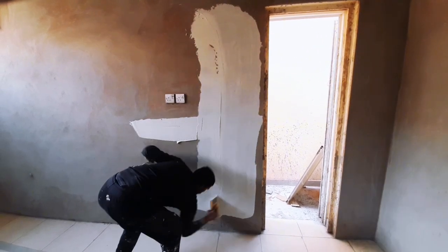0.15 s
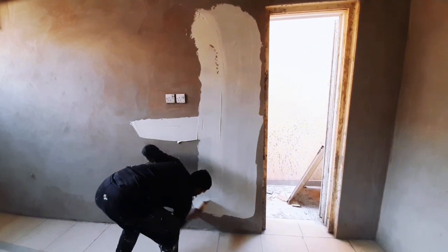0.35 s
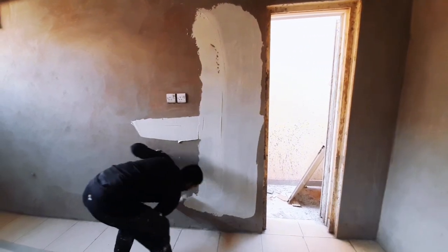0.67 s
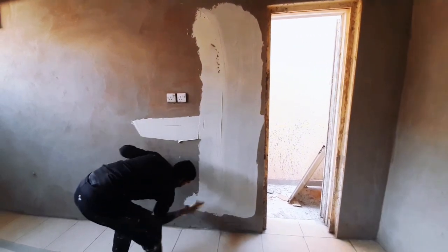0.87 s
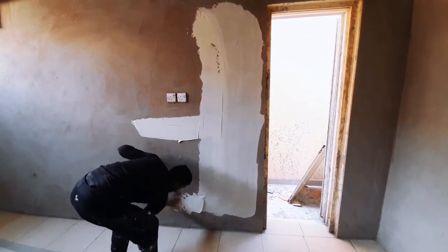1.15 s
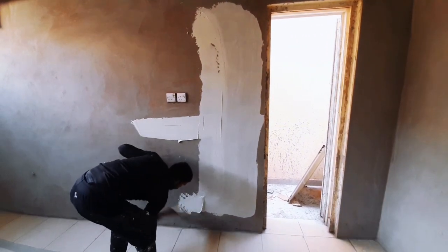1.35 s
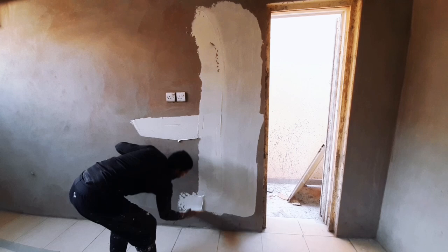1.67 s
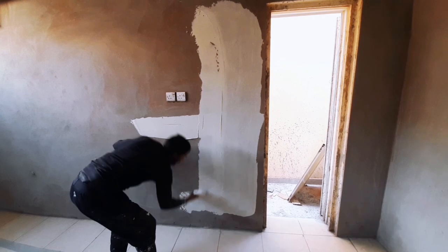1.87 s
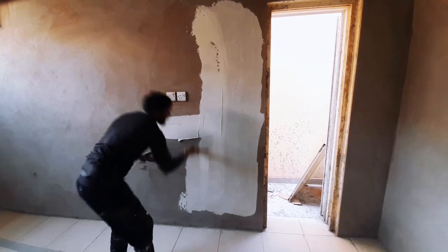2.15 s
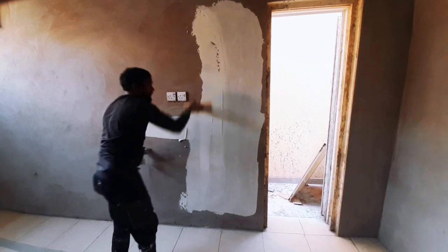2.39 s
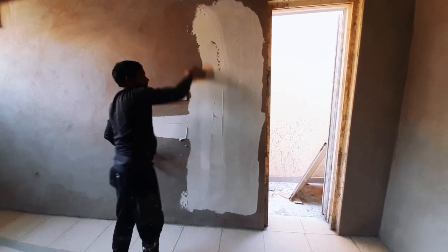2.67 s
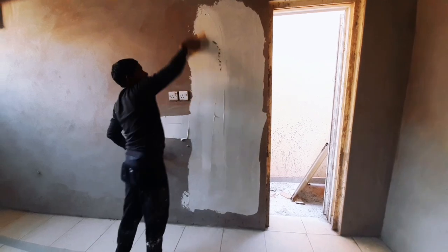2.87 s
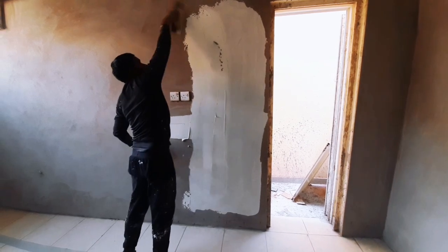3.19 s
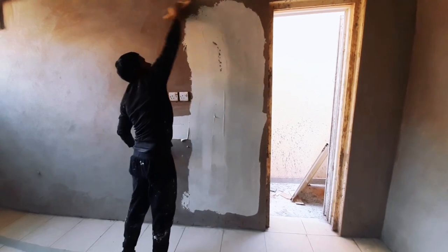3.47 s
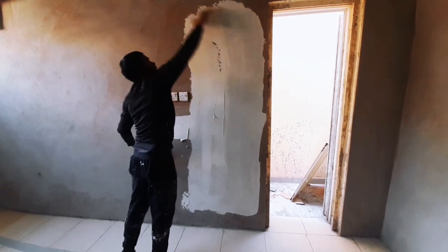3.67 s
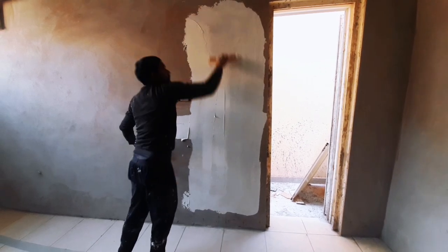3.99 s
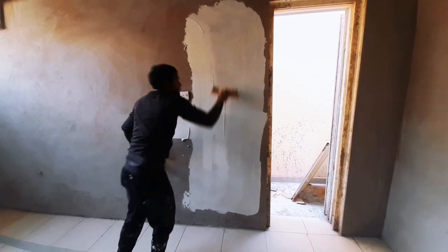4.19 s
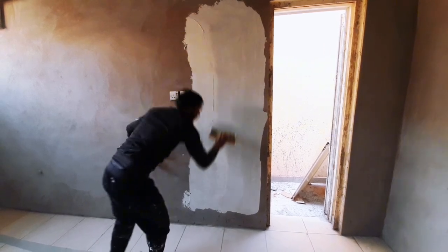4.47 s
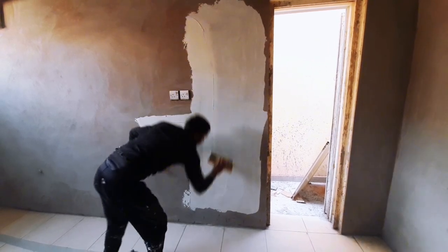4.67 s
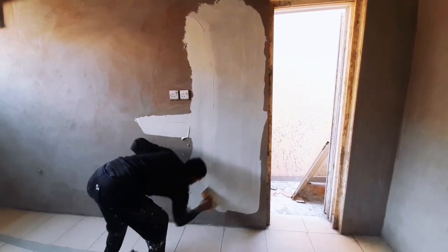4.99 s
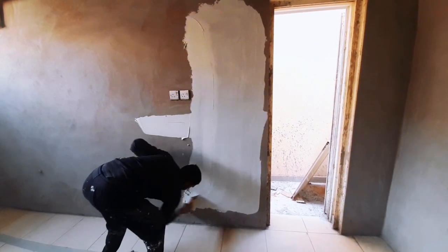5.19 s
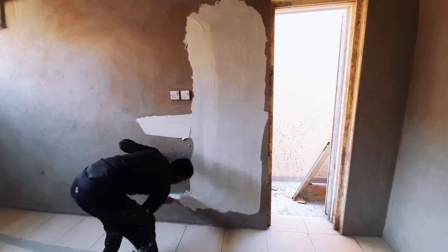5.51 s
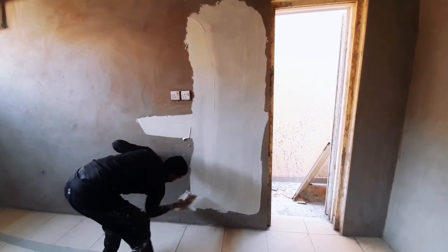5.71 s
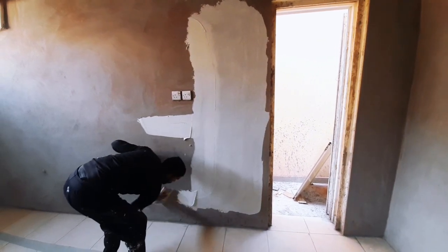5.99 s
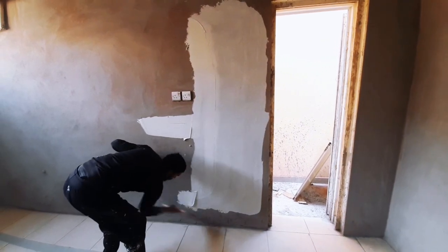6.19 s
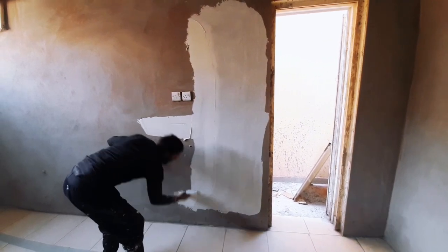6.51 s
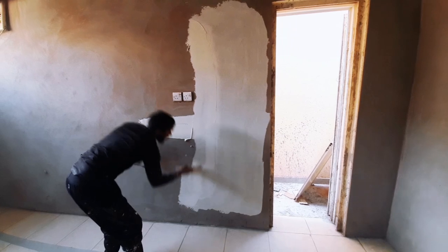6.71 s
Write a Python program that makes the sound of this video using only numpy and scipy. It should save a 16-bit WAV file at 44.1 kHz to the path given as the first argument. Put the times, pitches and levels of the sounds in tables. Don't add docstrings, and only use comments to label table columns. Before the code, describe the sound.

In a bare, hard-walled room, a steel plastering blade drags gritty putty across cement. A rough pull opens, then a quiet reloading with soft knocks, short swipes and a strong upward push. A faint glide leads to harsh scrapes at the top and a long downward pull, then another quiet loading, a wipe, a sharp knock and a last push. Stereo, roomy pickup with a faint low hum.

```python
import sys
import numpy as np
from scipy import signal
from scipy.fft import rfft, irfft, next_fast_len
from scipy.io import wavfile
from scipy.ndimage import uniform_filter1d, map_coordinates

SR = 44100
rng = np.random.default_rng(int(sys.argv[2]) if len(sys.argv) > 2 else 0)


def natural_amplitude(level_db):
    exponent = np.asarray(level_db, float) / 20
    return 10 ** exponent


def master_out(mix):
    frames = np.transpose(np.atleast_2d(mix))
    ceiling = np.clip(frames, -1, 1)
    pcm = np.round(ceiling * 32767).astype(np.int16)
    wavfile.write(sys.argv[1], SR, pcm)


N = 302085
RUN_IN = 22050
TOTAL = N + RUN_IN

# time_s, pressure_db, flatness, bend
FIRST_PULL = [(0.0, -16.5, 0.73, .1), (.16, -19.5, 0.94, .3), (.3, -17, 0.86, 0.45), (.44, -20, 0.61, 1.0),
              (.55, -24.5, 0.94, 0.55), (.66, -23.5, 1, 0.1)]
FIRST_LOADING = [(.86, -36, 0.42, -0.87), (1.01, -34, 0.83, -1.41)]
PUSH_UP = [(1.686, -11, 0.82, -0.77), (1.77, -22, 0.57, -0.56), (1.859, -21.5, 1.0, -0.72),
           (1.93, -14.5, 0.47, -0.59), (2.04, -17.5, 0.84, 0.79), (2.14, -17, 0.29, 1),
           (2.248, -12.5, 0.64, 0.64)]
GLIDE_UP = [(2.37, -32.5, .55, 0.0), (2.51, -32.5, 0.87, -0.28), (2.63, -30.5, .55, -0.7)]
FLICK_AT_TOP = [(3.12, -34.5, .4, -1.3), (3.18, -24.5, 0.23, -0.38), (3.22, -16.5, 0.05, 0.22),
                (3.29, -18.5, 0.26, 0.64)]
TURN_AT_TOP = [(3.34, -26.5, 0.52, -.4), (3.45, -23, 0.46, -1.3), (3.52, -12, 0.48, -2.2),
               (3.59, -8.5, 0.58, -1), (3.76, -21, 0.77, 0.99), (3.95, -13, 0.5, -0.6)]
LONG_PULL = [(3.97, -15, 0.8, -0.31), (4.08, -15, 0.55, 0.046), (4.35, -16.5, 0.79, -0.62),
             (4.42, -20.5, .7, -.3), (4.58, -16, 0.63, 0.17), (4.78, -16.5, 0.68, -0.048),
             (5.0, -19, 0.87, -.2), (5.38, -19, 0.73, -0.59), (5.47, -26, 0.85, -.1)]
SECOND_LOADING = [(5.58, -47, 1.42, -.1), (5.7, -41, 0.71, -.2), (5.8, -34.5, 1.02, -0.33)]
WIPE = [(5.925, -24, 0.42, -0), (5.99, -16, 0.18, -0.1), (6.08, -34, 0.78, -0.8)]
LAST_PUSH = [(6.55, -26, 0.61, -.9), (6.59, -20, 0.75, -.7), (6.64, -15.5, 0.86, -0.25),
             (6.75, -15.5, 0.25, -0.14), (6.85, -21.5, 0.67, -.7)]
STROKES = (FIRST_PULL, FIRST_LOADING, PUSH_UP, GLIDE_UP, FLICK_AT_TOP, TURN_AT_TOP, LONG_PULL,
           SECOND_LOADING, WIPE, LAST_PUSH)
STROKE_DRYNESS = [-1.5, 2.5, 0, -3.5, 3, -0.5, 0.5, 3.5, 3.5, 0]
# peak_s, rise_s, fall_s, pressure_db, flatness
SWIPES = [
    (1.269, .19, 0.095, -17, 0.29),
    (1.45, .3, .2, -48, 0.99),
    (1.593, .012, 0.065, -19, 0.9),
    (2.8, 0.11, 0.037, -27.5, 0.62),
    (3.04, 0.076, .3, -39.5, 0.74),
    (6.18, 0.34, 0.38, -41, 0.78),
    (6.423, 0.13, 0.093, -17, 0.68),
    (6.49, 0.091, 0.13, -21.5, 0.63),
]
# time_s, height_m
BLADE_HEIGHT = [(0.0, 1.4), (.3, 0.11), (.8, 0.25), (1.8, 0.09), (2.5, 0.74), (3.3, 1.3), (3.8, 1.6),
                (5.3, .2), (6.0, 1.1), (6.6, 0.23), (6.85, 0.62)]

# low_hz, high_hz, ring_cycles, catches_per_s, share_of_lean
SHAKEN_BODIES = [(919, 3190, 8.4, 5000, 0.74), (223, 497, 13, 1200, 0.19), (509, 913, 10.3, 2500, 0.25)]
# pitch_hz, level_db
BODY_COLOUR = [(210, -22), (290, -11), (430, -10), (520, -5.5), (670, 5), (850, -2), (1100, -7.5),
               (1400, -1), (1800, 4), (2200, 2), (2700, -6.5)]
# pitch_hz, level_db
GRIT_COLOUR = [(1650, -61), (2800, -2.5), (6590, -5), (7600, -8.5), (8590, -22.5), (12000, -14.5),
               (15600, -22)]

# pitch_hz, fade_by_60_db_s
ROOM_FADE = [(200, 1.0), (530, 1), (1400, 0.84), (3700, 0.76), (9700, 0.33)]
# pitch_hz, likeness
EAR_LIKENESS = [(60, .9), (130, 0.46), (290, 0.89), (640, 0.61), (1410, 0), (3100, 0.092), (6800, 0.0),
                (15000, 0.074)]
# pitch_hz, left_lead_db
LEFT_LEAD = [(60, 10), (110, 5.5), (250, 1.5), (1300, 2.5), (4400, -0.3), (15000, 3.1)]

# pitch_hz, level_db
AIR_COLOUR = [(25, -57), (50, -7.5), (90, -13), (130, 2.5), (180, -39), (300, -5), (800, -16), (3000, -39)]
# time_s, level_db
HUM_SWELL = [(0.0, -71), (.25, -61), (.93, -51.5), (1.221, -73), (1.56, -67), (1.75, -53), (3.5, -56.5),
             (3.95, -57.5), (6.3, -66.5), (6.75, -55)]

# time_s, peak_db, thud_db, tick_db, thud_pitch_hz
TAPS = [
    (1.001, -19, -9.5, -40, 390),
    (1.146, -24, -29, -39, 377),
    (1.549, -44, -27, -39.5, 710),
    (1.59, -17, -16, -33, 552),
    (2.774, -24, -35, -42.5, 939),
    (6.32, -31, -39, -40, 1050),
    (6.352, -15, -13.5, -48, 1000),
]
# pitch_hz, level_db, fade_by_60_db_s
TAP_MODES = [(211, -37, 0.017), (305, -4, 0.02), (408, -0.5, 0.061), (605, 7.5, 0.019), (757, -5.5, 0.081),
             (935, 3.5, 0.024), (1400, -5, 0.047), (1840, -13, .03)]

# start_s, length_s, pitch_hz, width_hz, level_db
SINGING = [
    (1.249, 0.056, 1850, 500, -17.5),
    (1.656, 0.075, 1320, 1000, -12),
    (3.028, 0.098, 990, 250, -35),
    (3.169, 0.1, 1166, 222, -15),
    (3.515, 0.11, 1180, 350, -26),
    (3.8, 1, 1780, 450, -23),
    (4.6, 0.8, 1960, 450, -26),
    (6.408, 0.055, 1950, 400, -22),
    (6.634, 0.038, 644, 150, -28),
    (6.717, .05, 2680, 300, -20),
]

USUAL_DB = -18


def rms_one(x):
    return x / np.sqrt(np.mean(x ** 2) + 1e-20)


def at_hz(points, hz):
    table_hz, values = np.transpose(points)
    return np.interp(np.log(np.maximum(hz, 1)), np.log(table_hz), values)


def coloured(x, spectrum):
    count = x.shape[-1]
    size = next_fast_len(count)
    gain = natural_amplitude(at_hz(spectrum, np.fft.rfftfreq(size, 1 / SR)))
    return irfft(rfft(x, size) * gain, size)[..., :count]


def drift(rate):
    r = np.exp(-80 * np.pi * rate / SR)
    noise = rng.standard_normal(TOTAL // 40 + 2002)
    slow = signal.lfilter([1], [1, -2 * r, r * r], noise)[2000:]
    return np.interp(np.arange(TOTAL) / 40, np.arange(len(slow)), rms_one(slow))


def ring(clicks, hz, t60):
    r = natural_amplitude(-60 / (t60 * SR))
    w = 2 * np.pi * hz / SR
    return signal.lfilter([0, np.sin(w)], [1, -2 * r * np.cos(w), r * r], clicks + 1e-18)


def contact():
    land_s, lift_s = 0.088, 0.088
    swipe_bend, swipe_dryness_db, swipe_dry_follows = -0.66, -2, 0.13
    faint_db = -35
    t = np.arange(-RUN_IN, N) / SR
    pressures, holds = [], []
    for stroke, dry_db in zip(STROKES, STROKE_DRYNESS):
        s, db, flat, bend = np.transpose(stroke)
        before = np.maximum(s[0] - t, 0) * (s[0] > .02)
        off = before / land_s + np.maximum(t - s[-1], 0) / lift_s
        pressures.append(np.interp(t, s, db) - 30 * off)
        holds.append([np.interp(t, s, flat), np.interp(t, s, bend), dry_db + 0 * t])
    for s, rise, fall, db, flat in SWIPES:
        off = np.maximum(s - t, 0) / abs(rise) + np.maximum(t - s, 0) / abs(fall)
        pressures.append(db - 30 * off ** 1.18)
        dry_db = swipe_dryness_db + swipe_dry_follows * (db - USUAL_DB) + 2 * min(db - faint_db, 0)
        holds.append(np.outer([flat, swipe_bend, dry_db], 1 + 0 * t))
    lead = np.argmax(pressures, axis=0)[None, None]
    leading_hold = np.take_along_axis(np.array(holds), lead, axis=0)[0]
    flat, bend, dry_db = uniform_filter1d(leading_hold, size=600)
    press_db = np.maximum(np.max(pressures, axis=0), -80)
    return t, press_db, flat - 0.7, bend, dry_db


def catches(per_s, spread_db, chatter_db):
    force = natural_amplitude(spread_db * np.minimum(rng.exponential(1, TOTAL), 4))
    push_or_pull = rng.choice([-1, 1], TOTAL)
    caught = rng.random(TOTAL) < per_s / SR
    return force * push_or_pull * caught * natural_amplitude(chatter_db * drift(42))


def shaken(drive, lean, low_hz, high_hz, cycles, per_s, leaning):
    clicks = catches(per_s, spread_db=2.5, chatter_db=-0.4)
    dealt = rng.integers(0, 8, TOTAL)
    out, power = 0, 0
    for k, hz in enumerate(np.geomspace(low_hz * 1.093, high_hz / 1.123, 8)):
        lean_db = leaning * lean * np.log2(hz / low_hz)
        favour = natural_amplitude(at_hz(BODY_COLOUR, hz) + lean_db + 2.5 * drift(2.9))
        out = out + favour * ring(clicks * (dealt == k), hz, cycles / hz) * np.sqrt(hz)
        power = power + favour ** 2
    steady = out / np.sqrt(power)
    low_cut = signal.butter(4, 0.72 * low_hz, "high", fs=SR, output="sos")
    return drive * rms_one(signal.sosfilt(low_cut, steady))


def scrape():
    t, press_db, flat, bend, dry_db = contact()
    extra_db = press_db - USUAL_DB
    height_m = np.interp(t, *np.transpose(BLADE_HEIGHT))
    thrum_db = -36.5 + 0.52 * extra_db + 9.5 * flat - 7 * height_m
    thrum = np.hypot(natural_amplitude(thrum_db), natural_amplitude(-51.5))
    flex = natural_amplitude(press_db - 9 + 34.5 * flat)
    drives = [natural_amplitude(press_db), thrum, flex]
    lean = 10 * bend
    bodies = sum(shaken(drive, lean, *body) for drive, body in zip(drives, SHAKEN_BODIES))
    grit = natural_amplitude(-25.5 + dry_db + 0.93 * extra_db + 1 * flat)
    hiss = rms_one(coloured(catches(12000, spread_db=1.5, chatter_db=-1.13), GRIT_COLOUR))
    return grit * hiss + bodies


def two_ears(mid, side, hz):
    alike = np.clip(at_hz(EAR_LIKENESS, hz), -1, 1)
    pair = np.sqrt(1 + alike) * mid + np.sqrt(1 - alike) * side * [[1], [-1]]
    return pair * natural_amplitude(at_hz(LEFT_LEAD, hz) * [[.5], [-.5]]) / np.sqrt(2)


def echo_pattern():
    t = np.arange(SR) / SR
    white = rng.standard_normal((2, 2, SR))
    tail = 0
    edges = np.append(100 * 2 ** np.arange(0, 7.6, .75), 19000)
    for k, (low, high) in enumerate(zip(edges, edges[1:])):
        band_filter = signal.butter(2, [low, high], "band", fs=SR, output="sos")
        band = signal.sosfilt(band_filter, white[k % 2])
        t60 = at_hz(ROOM_FADE, np.sqrt(low * high))
        tail = tail + band * natural_amplitude(-60 * t / t60) / np.sqrt(t60 * SR / np.log(1e6))
    return 0.77 * tail * np.minimum(t / 0.0012, 1)


def room(x):
    places, step_s = 7, .05
    count = len(x)
    size = next_fast_len(count + SR)
    place = np.arange(count) / (step_s * SR)
    echoes = 0
    for k in range(places):
        away = np.abs((place - k + places / 2) % places - places / 2)
        piece = x * np.cos(np.pi / 2 * np.minimum(away, 1))
        echoes = echoes + rfft(piece, size) * rfft(echo_pattern(), size)
    echoes = irfft(two_ears(*echoes, np.fft.rfftfreq(size, 1 / SR)), size)[:, :count]
    lag = -2 + 9 * drift(3)
    direct = [map_coordinates(x, [np.arange(count) + way * lag / 2], order=3) for way in (-1, 1)]
    direct = natural_amplitude(-8) * np.array(direct) * natural_amplitude([[.7], [-.7]])
    return (echoes + direct)[:, RUN_IN:]


def outside():
    hum_hz, hum_width_hz = 110, 18
    hz = np.fft.rfftfreq(N, 1 / SR)
    air_pair = two_ears(*rfft(rng.standard_normal((2, N))), hz)
    air = rms_one(irfft(air_pair * natural_amplitude(at_hz(AIR_COLOUR, hz)), N))
    narrow = 1 / (1 + (2 * (hz - hum_hz) / hum_width_hz) ** 2)
    hum = rms_one(irfft(rfft(rng.standard_normal(N)) * narrow, N))
    swell = natural_amplitude(np.interp(np.arange(N) / SR, *np.transpose(HUM_SWELL)))
    return natural_amplitude(-57) * air + swell * hum * natural_amplitude([[2.5], [-2.5]])


def taps():
    at = [RUN_IN + round(row[0] * SR) for row in TAPS]
    _, _, thud_db, tick_db, pitch_hz = np.transpose(TAPS)
    thud = np.zeros(TOTAL)
    for hz, level_db, t60 in TAP_MODES:
        clicks = np.zeros(TOTAL)
        octaves_away = np.abs(np.log2(hz / pitch_hz))
        clicks[at] = natural_amplitude(thud_db + level_db - 6 - 7 * octaves_away)
        thud += ring(clicks, hz, t60)
    thud = signal.sosfilt(signal.butter(4, 200, "high", fs=SR, output="sos"), thud)
    burst = np.zeros(TOTAL)
    burst[at] = natural_amplitude(tick_db + 2.5)
    tick = natural_amplitude(36.0) * coloured(burst, GRIT_COLOUR)
    fade = signal.lfilter([1], [1, -natural_amplitude(-60 / (0.0037 * SR))], burst)
    crumbs = fade * rms_one(coloured(rng.standard_normal(TOTAL), GRIT_COLOUR))
    return thud + tick + crumbs


def singing():
    out = np.zeros(TOTAL)
    clicks = catches(4000, spread_db=-3.0, chatter_db=1.0)
    for start, length, hz, width_hz, level_db in SINGING:
        at, size = RUN_IN + round(start * SR), round(length * SR)
        r = np.exp(-np.pi * width_hz / SR)
        resonance = [1, 0, -1, 1, -2 * r * np.cos(2 * np.pi * hz / SR), r * r]
        tone = rms_one(signal.sosfilt([resonance, resonance], clicks[at:at + size]))
        out[at:at + size] += natural_amplitude(level_db) * tone * np.hanning(size)
    return out


def scene():
    blade = scrape() + singing() + taps()
    return room(blade) + outside()


def band_limit(x):
    return signal.sosfilt(signal.butter(12, 16850, fs=SR, output="sos"), x)


def record(dry):
    rounded = 1.3 * np.tanh(dry / 1.3)
    treble_cut = signal.ellip(12, .3, 60, 15790, fs=SR, output="sos")
    finished = signal.sosfilt(treble_cut, rounded)
    return band_limit(finished)


dry = scene()
out = record(dry)
master_out(out)
```